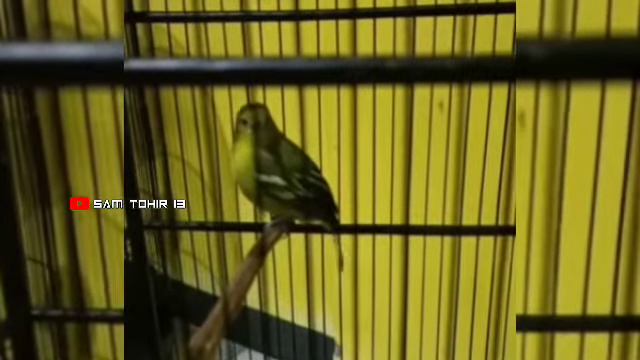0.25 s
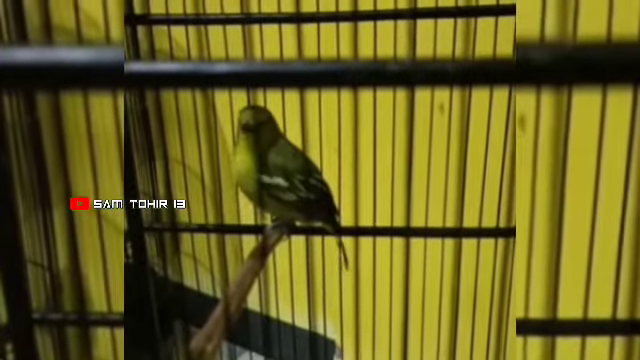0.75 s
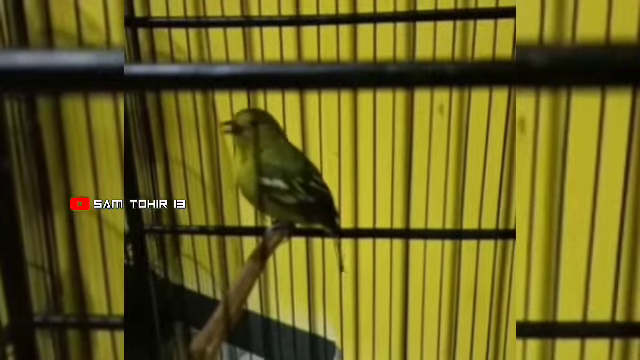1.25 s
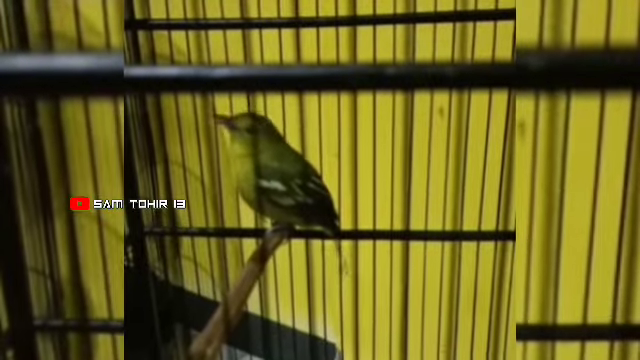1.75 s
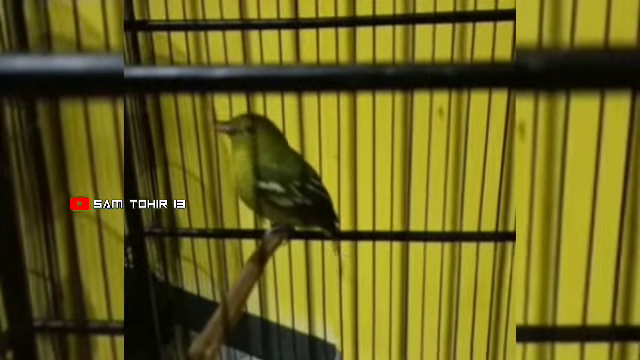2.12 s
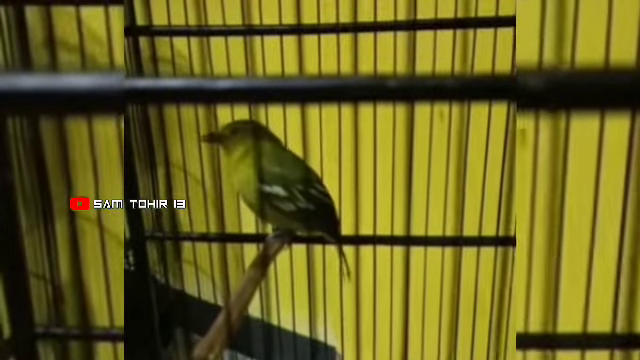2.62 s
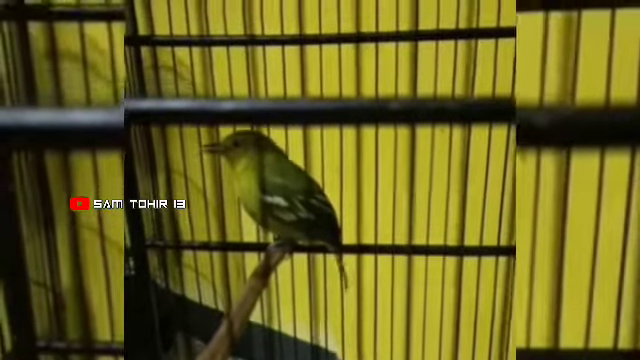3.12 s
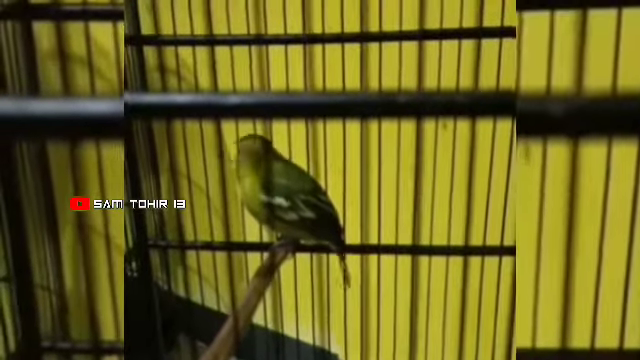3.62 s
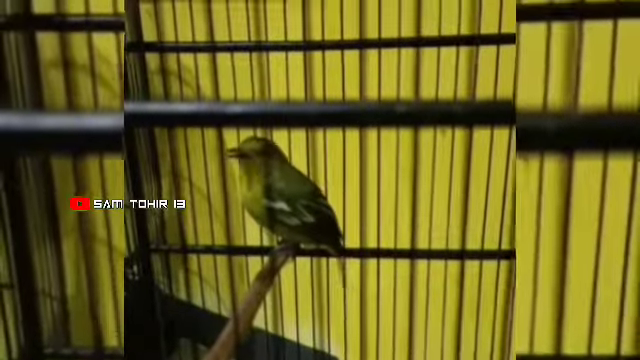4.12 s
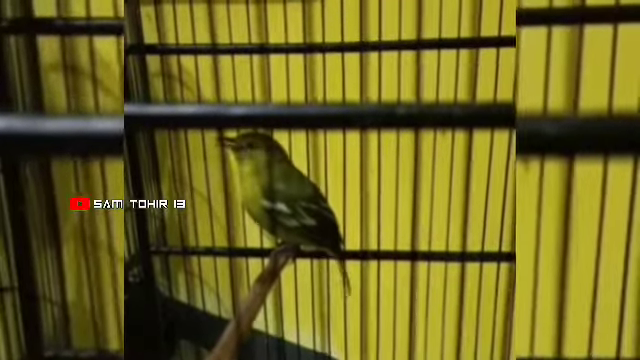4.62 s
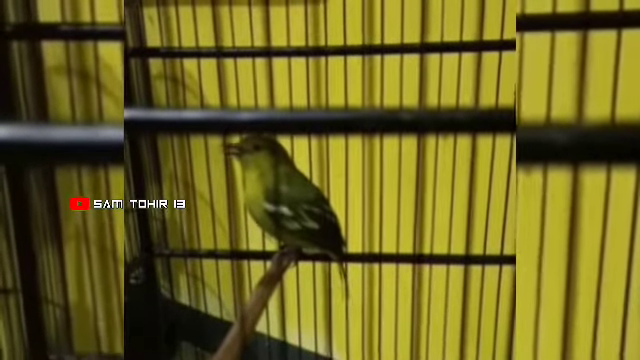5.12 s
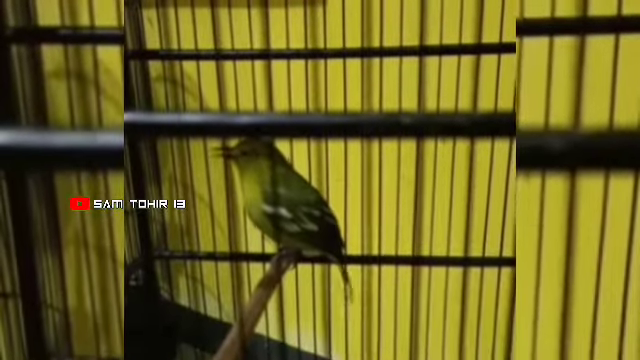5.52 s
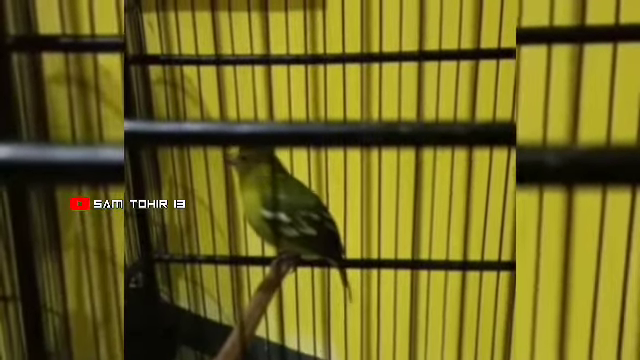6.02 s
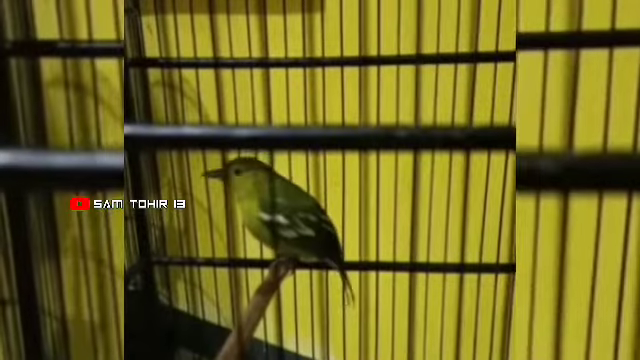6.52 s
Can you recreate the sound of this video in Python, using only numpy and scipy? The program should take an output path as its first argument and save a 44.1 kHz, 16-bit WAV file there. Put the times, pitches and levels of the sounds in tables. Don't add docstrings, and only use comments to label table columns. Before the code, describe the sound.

A small caged bird very near the phone gives harsh, buzzy double notes about six times a second. Thin high seeps come from farther off. A falling trill from a neighbour enters midway, then a quick warble, more trills, low rising chirps and high pipes. Under it all a low engine drones past and traffic washes, in an echoing hard-walled yard, with slightly overdriven loud notes.

```python
import sys
import numpy as np
from scipy import signal
from scipy.fft import rfft, irfft
from scipy.io import wavfile
from scipy.ndimage import uniform_filter1d

SR = 44100
rng = np.random.default_rng(int(sys.argv[2]) if len(sys.argv) > 2 else 0)


def nominal_scale(level):
    x = np.asarray(level, float) / 20
    return 10 ** x


def file_out(sig):
    cols = np.atleast_2d(sig).T
    lim = np.clip(cols, -1, 1)
    pcm = np.round(lim * 32767).astype(np.int16)
    wavfile.write(sys.argv[1], SR, pcm)


N = 298116

# f/Hz, level/dB per Hz
STREET_COLOUR = [(12, -70), (20, -23), (76, -8.5), (92, -18), (109, -18), (224, -15), (413, -25),
                 (577, -25), (1700, -31.5), (2070, -36), (2450, -33.5), (6650, -39.5), (7230, -36),
                 (11900, -54.5), (15300, -39)]
# t/s, level/dB
STREET_LEVEL = [(0.0, -34.5), (1.77, -33.5), (2.6, -31.5), (3.2, -38), (4.5, -38), (4.85, -43.5),
                (5.69, -42.5), (6.76, -50)]
# t/s, cycle rate f/Hz, level/dB of its second multiple
ENGINE_PASS = [(0.0, 38.62, -34), (0.41, 37.71, -27), (0.81, 35.58, -25), (0.98, 35.78, -33),
               (1.43, 36.8, -24), (1.8, 36.26, -19), (2.33, 36.97, -30.5), (2.65, 36.43, -18),
               (3.03, 37.26, -15.5), (3.43, 37.42, -14), (3.71, 37.08, -22), (4.16, 37.9, -17.5),
               (4.48, 37.95, -17), (4.86, 38.35, -20), (5.52, 38.29, -17.5), (5.99, 39.26, -29.5),
               (6.76, 39.54, -30.5)]
# multiple of cycle rate, level/dB
WEAK_MULTIPLES = [(1, -38), (3, -41), (7, -37), (8, -75), (9, -87)]
SWELL_MULTIPLES = (4, 4, 4, 4, 4, 4, 4, 5, 5, 5, 5, 5, 6, 6, 6, 6)
# centre t/s, spread t/s, level/dB
LOAD_SWELLS = [(.42, 0.067, -31), (1.75, 0.15, -32), (2.7, 0.3, -25.5), (3.85, 0.42, -33), (4.7, 0.22, -37),
               (5.55, 0.23, -32.5), (6.5, 0.65, -41.5), (1.352, 0.32, -37), (2.8, 0.5, -31.5),
               (4.35, 0.264, -27.5), (5.6, 0.373, -28), (6.6, 0.33, -37), (.65, 0.2, -30.5),
               (1.35, 0.28, -21), (2.5, 0.36, -24.5), (3.7, 0.23, -30.5)]
# t/s, f/Hz, level/dB
SECOND_MOTOR = [
    (0.0, 59.5, -46),
    (1.08, 58.5, -33),
    (1.79, 59.7, -23.5),
    (1.95, 60.4, -32),
    (2.9, 61.95, -46),
]
# t/s, length t/s, f/Hz, level/dB
FAR_SEEPS = [(.1, 0.16, 7260, -40), (.55, 0.069, 6980, -32), (.88, 0.16, 7440, -30.5),
             (1.16, 0.053, 6940, -22.5), (1.139, 0.046, 5900, -27), (1.42, .12, 7330, -36),
             (2.003, 0.078, 2256, -25), (2.03, 0.077, 7400, -31), (2.986, 0.036, 6976, -23.5),
             (3.404, 0.11, 7220, -33.5), (3.634, 0.036, 7240, -25.5), (3.946, 0.15, 7220, -36.5),
             (4.552, 0.14, 8360, -41), (5.51, 0.1, 6760, -24), (5.62, 0.095, 6660, -28),
             (6.11, 0.053, 7990, -22), (6.44, 0.13, 7080, -27)]
# f/Hz, width f/Hz, level/dB
BREATH = [(4360, 5600, -7), (7870, 2300, 1.5), (13800, 9600, -10)]
# t/s, high note f/Hz, effort level/dB, low note level/dB against the high one
TRILL_LONG = [
    (2.465, 4786, -16, -21),
    (2.62, 4930, -13, -3),
    (2.82, 4438, -11, 2),
    (2.95, 4000, -15.5, 4.5),
    (3.05, 3448, -10, 3.5),
    (3.2, 3150, -18, 0),
    (3.361, 2950, -49.5, 22),
    (3.58, 2400, -56.5, 23.5),
]
TRILL_SECOND = [
    (4.942, 4144, -9.5, -28),
    (5.05, 3980, -7.5, -15.5),
    (5.3, 3801, -8.5, -14.5),
    (5.499, 3499, -7, -12),
    (5.699, 3353, -11, -8),
    (5.8, 3300, -33, 6),
]
TRILL_THIRD = [
    (6.118, 3988, -9.5, -30),
    (6.171, 3963, -3.5, -29.5),
    (6.3, 3793, -9, -22),
    (6.42, 3580, -7.5, -8.5),
    (6.6, 3527, -9, -3),
    (6.68, 3653, -8.5, -4.5),
    (6.76, 3947, -9.5, -4),
]
PAIR_RATES = [20, 22.7, 23.8]
# floor f/Hz, share
LOW_NOTE_TUNING = [(600, .57), (1750, .3), (2200, .22)]
# t/s, length t/s, from f/Hz, to f/Hz, peak level/dB
LOW_CHIRPS = [
    (5.718, 0.041, 1457, 1947, -9),
    (5.986, 0.058, 1413, 1930, -10),
    (6.236, 0.046, 1320, 1808, -8.5),
    (6.443, 0.054, 1284, 1882, -9.5),
    (6.583, 0.053, 1453, 1850, -7),
    (6.698, 0.064, 1586, 1972, -6.5),
]
HIGH_PIPES = [
    (5.79, 0.051, 6336, 6600, 1.5),
    (5.835, 0.153, 6775, 6940, -3.5),
    (6.24, 0.0403, 6140, 6600, -10.5),
    (6.278, 0.11, 6460, 6840, -5.5),
]
STRUCK_NOTES = [
    (2.397, 0.037, 4590, 4185, -9.5),
    (3.998, 0.046, 2500, 2280, -14.5),
    (4.0, 0.092, 3200, 3000, -30.5),
    (4.097, 0.027, 2126, 2164, -13),
    (4.192, 0.028, 2220, 2070, -13),
    (4.258, 0.05, 2090, 2235, -4.5),
    (4.388, 0.095, 3710, 3543, -12),
    (4.588, 0.083, 2790, 2560, 0),
    (4.728, .075, 3770, 3020, -7.5),
]
RISING_NOTES = [
    (4.23, 0.022, 1676, 1810, -12.5),
    (4.275, 0.087, 2300, 4320, -14.5),
    (4.352, .022, 2500, 2905, -7),
    (4.372, 0.021, 3090, 3730, -0.5),
    (4.52, .075, 1550, 2355, -8.5),
    (4.665, 0.052, 3544, 4105, 0),
]
# f/Hz, width f/Hz, level/dB
THROAT_MODES = [(1295, 390, -8.5), (1620, 140, -55), (2500, 820, 8), (2796, 1480, 10.5), (3300, 180, 15.5),
                (3673, 330, 14.5), (4508, 336, 9.5)]
# f/Hz, width f/Hz, level/dB
BEAK_MODES = [(5590, 720, 2.5), (6093, 445, 5.5), (8130, 3130, -6.5), (12100, 220, -83),
              (14000, 8300, -6.5)]
# t/s, note spacing t/s,
# first, second and trailing note level/dB
SCOLDS = [(0.049, 0.033, -2, -2.5, -15), (0.147, .03, -4.5, -46, -44), (0.2633, 0.032, -3, -5, -37),
          (0.412, 0.038, -3, -4, -34), (0.6022, 0.035, -5, -3.5, -8.5),
          (0.8137, 0.035, -2.5, -2.5, -27), (1.0195, .030, -4.5, -3.5, -5),
          (1.2107, 0.03, -2.5, -4, -8.5), (1.373, 0.034, -3, -2.5, -18),
          (1.5385, .029, -4.5, -3.5, -15.5), (1.7163, 0.029, -4, -4.5, -10.5),
          (1.912, .035, -5.5, -2.5, -27), (2.0927, 0.034, -3.5, -1.5, -13.5),
          (2.277, 0.035, -4.5, -2.5, -4.5), (2.5213, 0.031, -3.5, -1, -7.5),
          (2.6753, 0.046, -3.5, -5, -26), (2.8979, 0.032, -5.5, -3.5, -32),
          (3.0522, 0.03, -5, -3, -27), (3.2368, 0.028, -5, -6.5, -9), (3.716, 0.03, -5.5, -10, -38),
          (4.116, .03, -5.5, -7.5, -40), (4.266, 0.033, -5, 0, -4.5),
                    (4.4247, 0.036, -3, -2, -10.5), (4.547, 0.029, 0, -4.5, -27),
                    (4.726, .035, -5, -22, -38), (4.843, 0.034, -10, -10, -40),
                    (4.99, .039, -8.5, -6.5, -40), (5.142, 0.034, -7, -7, -32),
                    (5.2721, 0.034, -9, -5.5, -22), (5.41, 0.041, -6.5, -7, -40),
                    (5.579, 0.033, -6.5, -4, -40), (5.761, 0.034, -9.5, -6.5, -40),
                    (5.908, 0.035, -15.5, -13.5, -44), (6.0575, 0.034, -13.5, -13.5, -44),
                    (6.2054, 0.037, -12.5, -6, -40)]
SCOLD_LENGTHS = (0.049, 0.063, 0.064)
BEAK_OPENING = (-14, -13.5, -19)


def level(x):
    return x / np.sqrt(np.mean(x ** 2))


def play(table):
    s, *columns = np.transpose(table)
    where = slice(int(s[0] * SR), min(int(s[-1] * SR), N))
    t = np.arange(N)[where] / SR
    return where, [np.interp(t, s, column) for column in columns]


def edges(size, fade_s):
    i = np.arange(size) / (fade_s * SR)
    return np.sin(np.pi / 2 * np.clip(np.minimum(i, i[::-1]), 0, 1)) ** 2


def walk(rate):
    hold = int(SR / rate)
    steps = np.repeat(rng.standard_normal(N // hold + 1), hold)
    slewed = uniform_filter1d(uniform_filter1d(steps, hold), hold)
    return level(slewed[:N])


def tone(hz, second):
    phase = 2 * np.pi * np.cumsum(hz) / SR
    return np.sqrt(2) * (np.sin(phase) + second * np.sin(2 * phase))


def ring(x, hz, width):
    return signal.lfilter(*signal.iirpeak(hz, hz / width, SR), x)


def tract(x, modes):
    def shape(v):
        out = 0
        for k, (hz, width, db) in enumerate(modes):
            out = out + (-1) ** k * nominal_scale(db) * ring(ring(v, hz, 2 * width), hz, width)
        return out

    response = shape(signal.unit_impulse(2048))
    return shape(x) / np.sqrt(np.sum(response ** 2))


def yard(x, wet_db, t60_s, gap_s):
    port_lag = 8
    early = (-4, .035, 1 / 2000)
    t = np.arange(int(.9 * SR)) / SR
    echoes = 0
    for db, fade_s, start_s in ((wet_db, t60_s, gap_s), early):
        tail = rng.standard_normal((2, len(t))) * np.exp(-np.log(1000) * t / fade_s) * (t > start_s)
        echoes = echoes + tail * nominal_scale(db) / np.sqrt(np.sum(tail ** 2, axis=1, keepdims=True))
    direct = np.array([x, np.roll(x, port_lag)])
    return direct + signal.fftconvolve(x[None], echoes, axes=1)[:, :N]


def street(alike_hz=500, apart=0.8, flicker_db=1.5, gain_db=3.0):
    f = np.fft.rfftfreq(N, 1 / SR) + 1
    hz, db = np.transpose(STREET_COLOUR)
    colour = nominal_scale(np.interp(np.log(f), np.log(hz), db))
    colour /= np.sqrt(2 * np.mean(colour ** 2 * (f > 300) * (f < 900)))
    mid, side = rfft(rng.standard_normal((2, N))) * colour
    side = side * apart * np.tanh(f / alike_hz)
    ports = np.array([mid + side, mid - side])
    out = 0
    for centre in 30 * 2. ** np.arange(10):
        band = np.cos(np.pi / 2 * np.clip(np.log2(f / centre), -1, 1)) ** 2
        out = out + nominal_scale(flicker_db * walk(5.7)) * irfft(band * ports, N)
    _, (loudness_db,) = play(STREET_LEVEL)
    return out * nominal_scale(gain_db + np.resize(loudness_db, N))


def engine(unsteady=0.0038, swell_db=5.0, fade_db=3.5):
    _, (hz, load_db) = play(ENGINE_PASS)
    t = np.arange(N) / SR
    phase = 2 * np.pi * np.cumsum(np.resize(hz, N) * (1 + unsteady * walk(6.6))) / SR
    out = nominal_scale(np.resize(load_db, N) + walk(9)) * np.sin(2 * phase)
    quiver = nominal_scale(2.1 * walk(9))
    for k, (s, spread, db) in zip(SWELL_MULTIPLES, LOAD_SWELLS):
        passing = np.exp(-.5 * ((t - s) / spread) ** 2)
        out += quiver * nominal_scale(db) * passing * np.sin(k * phase)
    for k, db in WEAK_MULTIPLES:
        fade = fade_db * k * np.arange(N) / N
        out += nominal_scale(db + swell_db * walk(2.47) - fade) * np.sin(k * phase)
    return np.sqrt(2) * out


def second_motor():
    out = np.zeros(N)
    where, (hz, db) = play(SECOND_MOTOR)
    out[where] = nominal_scale(db) * edges(len(hz), 0.51) * tone(hz, 0.063)
    return out


def seeps(smear=0.0252):
    out, drift = np.zeros(N), walk(300)
    for s, length, hz, db in FAR_SEEPS:
        where = slice(int(s * SR), int((s + length) * SR))
        size = nominal_scale(db) * edges(len(out[where]), 0.032)
        out[where] += size * tone(hz * (1 + smear * drift[where]), 0)
    return out


def trills(duty=.78, snap=0.55, octave_db=-14, air_db=-15, lean=.6, spread=.55):
    fall, rasp, uneven_db = .045, .075, 1.6
    smooth, strained = 0.161, 0.483
    out, effort, shake, rattle = np.zeros(N), np.zeros(N), walk(700), walk(900)
    tables = (TRILL_LONG, TRILL_SECOND, TRILL_THIRD)
    for table, rate, (floor_hz, share) in zip(tables, PAIR_RATES, LOW_NOTE_TUNING):
        where, (high_hz, high_db, low_db) = play(table)
        low_hz = floor_hz + share * high_hz
        rough = smooth + strained * nominal_scale(-np.abs(low_db) / 2)
        for hz, db, late in ((high_hz, high_db, 0), (low_hz, high_db + low_db, .55)):
            turn = (np.arange(len(hz)) * rate / SR + late) % 1
            u = np.clip(turn / duty, 0, 1)
            size = nominal_scale(db + uneven_db * walk(40)[where]) * np.sin(np.pi * u ** snap) * edges(len(u), 0.0017)
            pitch = hz * (1 + fall * (1 - 2 * u) + rasp * rough * shake[where])
            out[where] += size * tone(pitch, nominal_scale(octave_db) * late)
            effort[where] += size
        gap_hz = high_hz - low_hz
        between = low_hz + lean * gap_hz + spread * gap_hz * rattle[where]
        out[where] += rough * effort[where] * tone(between, 0)
    return out + nominal_scale(air_db) * tract(effort * rng.standard_normal(N), BREATH)


def whistles(notes, octave_db, wobble, flutter_db, air_db, bend, crest, rise_db, sag_db):
    out, effort, drift, flutter = np.zeros(N), np.zeros(N), walk(300), walk(90)
    for s, length, from_hz, to_hz, peak_db in notes:
        where = slice(int(s * SR), min(int((s + length) * SR), N))
        u = np.linspace(0, 1, len(out[where]))
        hz = to_hz + (from_hz - to_hz) * (1 - u) ** bend
        db = peak_db + np.interp(u, (0, crest, 1), (-rise_db, 0, -sag_db))
        size = nominal_scale(db + flutter_db * flutter[where]) * edges(len(hz), 0.0017)
        out[where] += size * tone(hz * (1 + wobble * drift[where]), nominal_scale(octave_db))
        effort[where] += size
    return out + nominal_scale(air_db) * tract(effort * rng.standard_normal(N), BREATH)


def chirps():
    return whistles(LOW_CHIRPS, octave_db=-28, wobble=0.011, flutter_db=-1.5, air_db=-32,
                    bend=1.7, crest=0.79, rise_db=11, sag_db=12)


def pipes():
    return whistles(HIGH_PIPES, octave_db=-17.5, wobble=0.0061, flutter_db=5, air_db=-29,
                    bend=7, crest=0.12, rise_db=4.5, sag_db=25.5)


def warble():
    struck = whistles(STRUCK_NOTES, octave_db=-36, wobble=.027, flutter_db=2.5, air_db=-20,
                      bend=2.2, crest=.12, rise_db=3, sag_db=17)
    rising = whistles(RISING_NOTES, octave_db=-30, wobble=.017, flutter_db=2.5, air_db=-20,
                      bend=1.9, crest=.7, rise_db=10, sag_db=3)
    return struck + rising


def scold(pulse_hz=520, jitter=.4, scatter_db=3, breath=0.87, lead=0.38, skew=0.92, point=3.57,
          gain_db=-3.0, beak_db=2):
    timing, strength = rng.standard_normal((8000, 2)).T
    at = np.cumsum(SR / pulse_hz * np.exp(jitter * timing)).astype(int)
    inside = at < N
    slaps = np.zeros(N)
    slaps[at[inside]] = nominal_scale(scatter_db * strength)[inside]
    slaps = level(slaps)
    air = rng.standard_normal(N)
    effort, gape = np.zeros((2, N))
    for s, spacing, *notes_db in SCOLDS:
        for k, (db, length, open_db) in enumerate(zip(notes_db, SCOLD_LENGTHS, BEAK_OPENING)):
            u = np.linspace(0, 1, int(length * SR))
            start = int((s + k * spacing - lead * length) * SR)
            swell = nominal_scale(db + gain_db) * np.sin(np.pi * u ** skew) ** point
            effort[start:start + len(u)] += swell
            gape[start:start + len(u)] += swell * nominal_scale(open_db + beak_db)
    middle = tract((slaps + breath * air) * effort, THROAT_MODES)
    top = tract((0.1 * slaps + air) * gape, BEAK_MODES)
    return middle, top


def scene():
    around = street() + engine() + second_motor()
    far = yard(trills() + seeps(), wet_db=-3, t60_s=.3, gap_s=.004)
    far += yard(warble(), wet_db=1.0, t60_s=0.27, gap_s=0.00069)
    far += yard(chirps(), wet_db=2.0, t60_s=0.37, gap_s=.005)
    near = yard(pipes(), wet_db=-6.5, t60_s=0.28, gap_s=0.0022)
    middle, top = scold()
    near += yard(middle, wet_db=-10.5, t60_s=.29, gap_s=.004)
    near += yard(top, wet_db=1.5, t60_s=.11, gap_s=.001)
    return around + far + near


def top_cut(x):
    return signal.sosfilt(signal.butter(12, 15450, fs=SR, output="sos"), x)


def record(dry, drive=0.74, ceiling_db=1.18, lopsided=.015, top_hz=15450):
    bent = nominal_scale(ceiling_db) * np.tanh(drive * (dry - lopsided * dry ** 2))
    low_pass = signal.ellip(10, .2, 60, top_hz, fs=SR, output="sos")
    mix = np.clip(signal.sosfilt(low_pass, bent), -1, 1)
    return top_cut(mix)


dry = scene()
out = record(dry)
file_out(out)
```